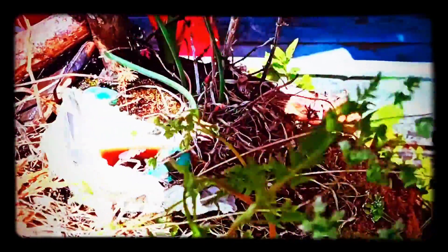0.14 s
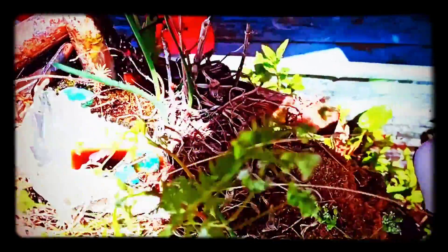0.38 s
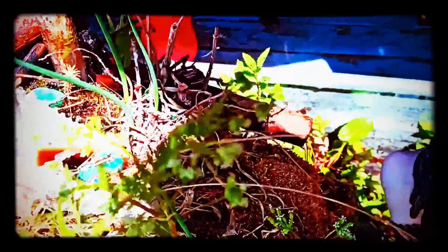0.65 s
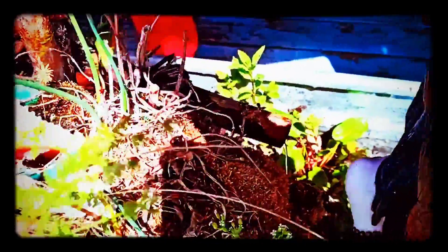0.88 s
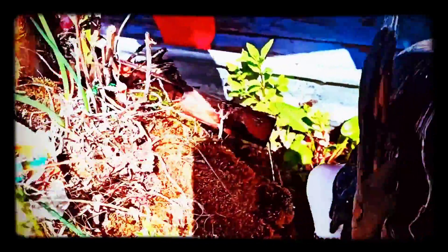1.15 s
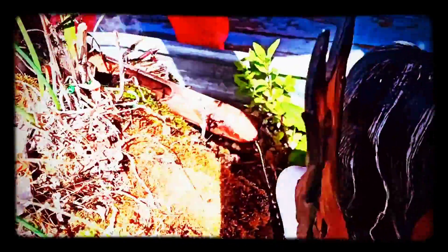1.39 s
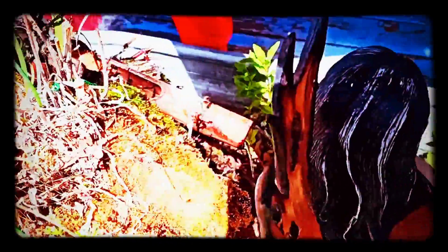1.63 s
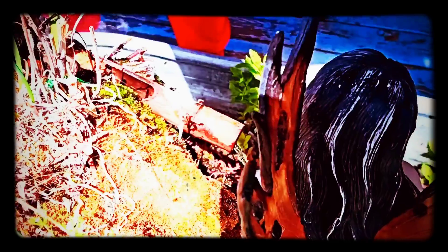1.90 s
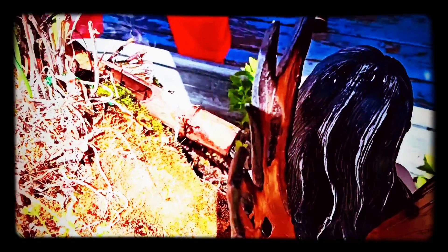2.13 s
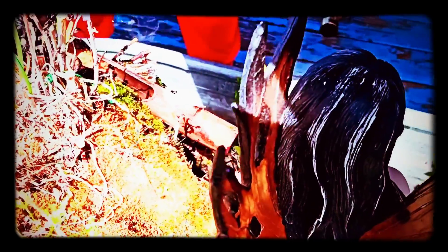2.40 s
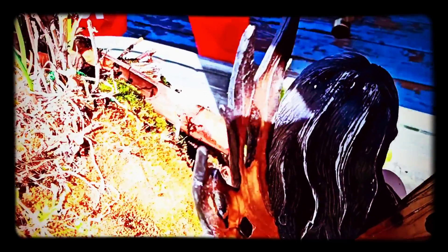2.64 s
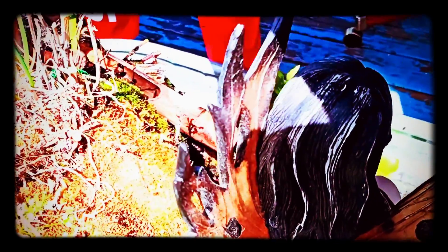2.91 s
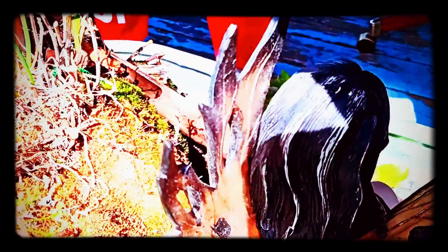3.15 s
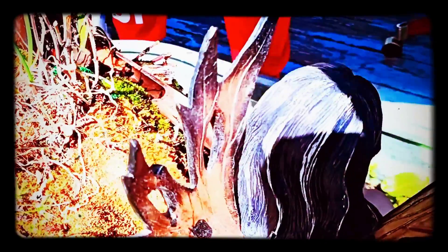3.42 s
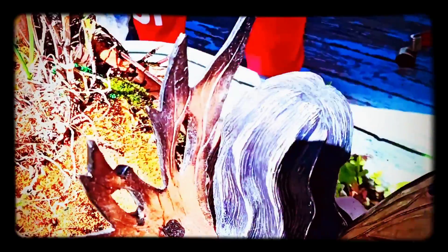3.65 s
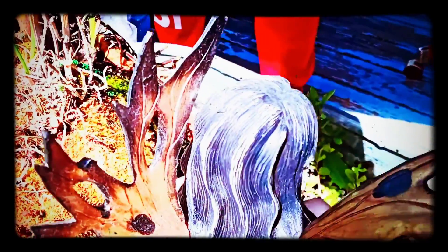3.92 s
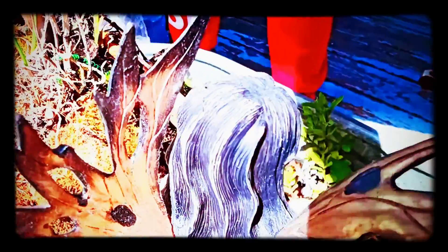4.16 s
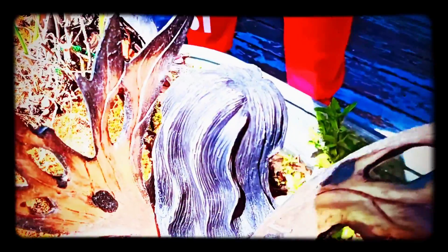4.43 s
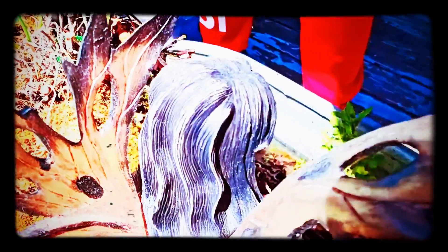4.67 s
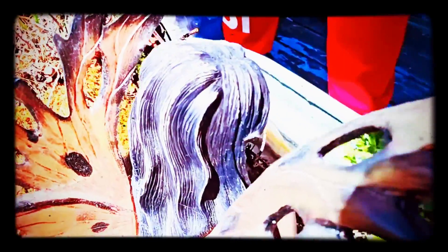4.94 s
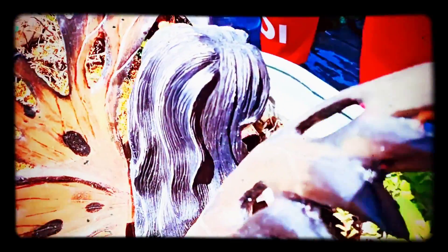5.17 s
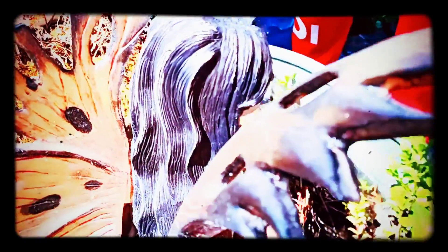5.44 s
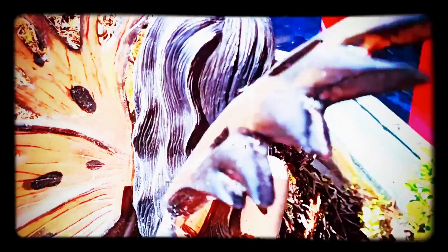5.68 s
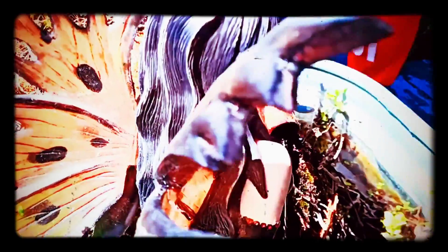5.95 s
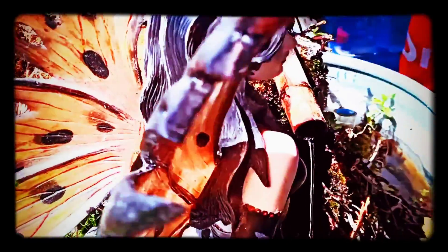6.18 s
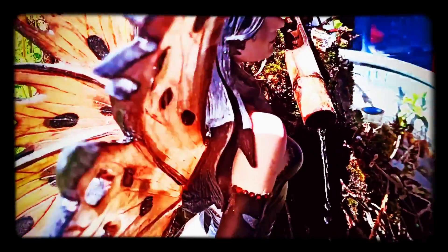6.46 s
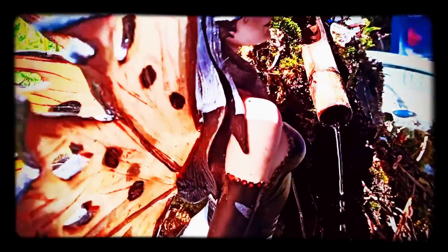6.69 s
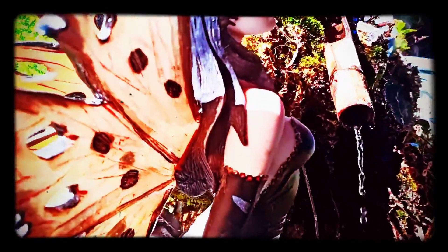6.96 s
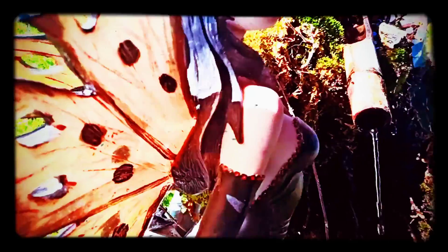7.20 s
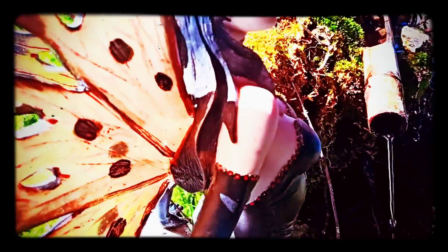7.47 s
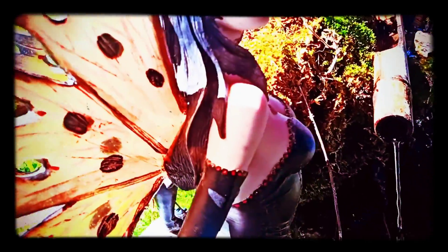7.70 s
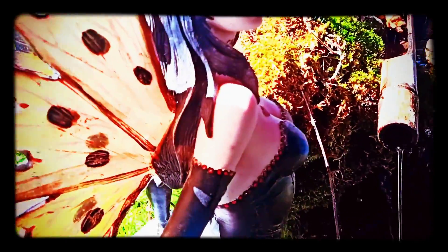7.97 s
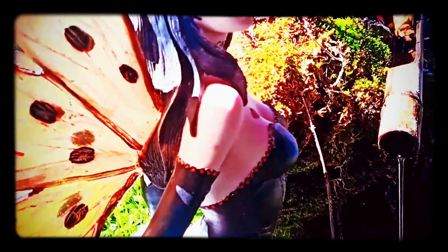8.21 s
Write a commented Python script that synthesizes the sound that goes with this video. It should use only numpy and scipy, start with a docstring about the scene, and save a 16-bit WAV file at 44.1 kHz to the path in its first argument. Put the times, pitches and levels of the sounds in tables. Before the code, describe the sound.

Outdoors, a thin stream falls from a spout into a shallow stony basin. At first the drips are sparse and light, with soft low bumps on the microphone; then bright splashes thicken, with bubbly plops and gurgles underneath. After a somewhat quieter middle, the last two seconds bring the strongest spits, plops and drops. Close, dry, single-channel sound with short dull echoes from stones and a faint distant rumble.

```python
"""Bright, ragged splashing drops, bubbly plops and glugs, soft thuds, dull knocks and a low outdoor rumble.
A garden fountain's thin jet breaks into drops on stones and shallow water: each loud drop is a noise
crack with a short, rising bubble sine. Bigger bubbles plop, the basin glugs and murmurs, fine spray spits.
Thuds are brief low waves at the hand-held microphone, handling clicks are dull noise bursts;
air, rumble and hiss are filtered noise."""
import sys
import numpy as np
from scipy import signal
from scipy.fft import rfft, irfft
from scipy.io import wavfile
from scipy.ndimage import uniform_filter1d

SR = 44100
rng = np.random.default_rng(int(sys.argv[2]) if len(sys.argv) > 2 else 0)


def attenuation_scalar(level_db):
    """Turn a level in dB into a linear amplitude multiplier (20 dB per decade)."""
    decades = np.asarray(level_db, float) / 20
    return 10 ** decades


def wav_record(signal):
    """Record a signal, one row per channel, as 16-bit PCM in the file named by sys.argv[1]."""
    frames = np.transpose(np.atleast_2d(signal))
    bounded = np.clip(frames, -1, 1)
    # unit amplitude maps onto the largest positive 16-bit level
    quanta = np.round(bounded * 32767).astype(np.int16)
    wavfile.write(sys.argv[1], SR, quanta)


N = 367794  # samples

# loud drops: (t/s, level before trim/dB, bubble end f/Hz, splash against bubble before trim/dB)
LOUD_DROPS = [(0.2974, -38.5, 5050, -24), (0.3278, -35, 4920, -24), (0.3972, -41.5, 5600, -21),
              (0.434, -52, 4920, 8), (0.464, -38.5, 6740, -8), (0.553, -45, 5340, -10),
              (0.59, -46, 6600, 1.5), (0.652, -44, 4670, -12), (0.499, -45, 6400, -7),
              (0.696, -51, 6300, -7), (0.873, -38.5, 3560, -18), (0.914, -41.5, 4060, -2.5),
              (0.9606, -40.5, 4750, -10), (1.191, -36, 5600, -8), (1.249, -41, 6360, -6),
              (1.326, -30.5, 5700, -5), (1.366, -40, 6400, -6), (1.403, -38.5, 5200, -14),
              (1.676, -34, 4800, -17), (1.761, -34.5, 5400, -12.5), (1.9782, -41, 7300, -5),
              (2.0344, -42, 7000, -19), (2.114, -35, 6620, -4.5), (2.27, -27.5, 5440, -8.5),
              (2.382, -38, 5800, -19), (2.432, -36.5, 6300, -31), (2.489, -39, 6100, 6),
              (2.5125, -40, 6200, 6.5), (2.548, -33.5, 6880, -3), (2.6259, -23.5, 6130, 1),
              (2.675, -35, 4440, -14), (2.6877, -40, 6250, 1), (2.71, -45, 6200, -3),
              (2.725, -47.5, 6360, 5.5), (2.783, -47, 6500, 2), (2.835, -41, 6200, -3),
              (2.879, -37, 6640, -1), (2.965, -27, 6770, -12), (3.07, -36, 6240, -6),
              (3.131, -31.5, 5600, -15), (3.235, -34.5, 6480, -7), (3.266, -44, 6200, -9),
              (3.435, -36, 6200, -1), (3.512, -33, 3900, -26), (3.758, -31.5, 6470, -32),
              (3.882, -40.5, 5900, -2), (4.251, -36, 6200, -1.5), (4.448, -28, 6140, -9.5),
              (4.5442, -38.5, 6840, -21), (4.624, -30.5, 5400, -31), (4.6864, -37, 5430, -19),
              (4.8342, -34.5, 6350, -2), (4.9262, -45, 7150, 7), (4.954, -30.5, 7020, -15),
              (5.086, -41.5, 5200, -17), (5.129, -40.5, 4520, -3), (5.19, -44, 6700, -2),
              (5.269, -49, 7100, -5), (5.352, -43, 5240, 5), (5.39, -40, 7900, 5), (5.455, -41, 4630, -12),
              (5.5586, -35.5, 5100, -5.5), (5.669, -32.5, 5230, -7), (5.7614, -29.5, 5600, -32),
              (5.804, -45.5, 5950, 5.5), (5.8583, -35.5, 5140, -13), (5.958, -39.5, 6140, 2.5),
              (6.1446, -28, 4760, -35), (6.1614, -37, 6250, 2), (6.221, -46.5, 5330, 9),
              (6.438, -43, 3440, -6), (6.5179, -30, 6400, -9), (6.5967, -28, 6200, -5),
              (6.662, -29.5, 5280, -7.5), (6.7606, -36.5, 4900, -10), (6.877, -42, 6500, 6.5),
              (6.971, -28, 5560, -7), (7.108, -37.5, 6240, 2), (7.2116, -40, 7000, -15),
              (7.2453, -36.5, 6200, 1), (7.305, -29, 5270, -0.5), (7.344, -39, 6500, 2),
              (7.4072, -49.5, 5400, 11), (7.505, -41, 4800, -21), (7.6197, -43.5, 3460, -12),
              (7.657, -41.5, 6600, 2.5), (7.7437, -38, 4600, -1), (7.823, -34, 3800, -9),
              (7.831, -22, 5400, -7), (7.952, -44.5, 4970, 3.5), (7.997, -37.5, 4220, -18),
              (7.969, -35, 6000, -9), (8.011, -41, 6360, 0), (8.1562, -31.5, 6860, -28),
              (8.199, -41.5, 6340, 4), (8.3036, -26, 6970, -8.5)]
# larger bubbles: (t/s, level before trim/dB, end f/Hz)
PLOP_BUBBLES = [(0.039, -44, 2780), (0.178, -47, 1440), (0.25, -34.5, 3800), (0.34, -45, 2220),
                (0.356, -40, 1460), (0.594, -39, 2630), (0.68, -43, 2760), (2.446, -40.5, 2390),
                (2.719, -31, 2400), (3.602, -49, 980), (4.282, -42.5, 1214), (4.706, -39, 2480),
                (4.838, -43, 1720), (5.115, -44, 2410), (5.151, -43, 1720), (5.241, -43, 2450),
                (5.286, -38, 2460), (5.332, -40, 2510), (5.361, -49, 2600), (5.457, -39, 2390),
                (5.665, -46, 2470), (5.692, -46, 1036), (6.663, -43, 925), (7.272, -42, 1075),
                (7.412, -39, 780), (8.196, -43, 885), (0.468, -42.5, 1430), (0.577, -38.5, 1050),
                (0.774, -35, 2610), (0.897, -38, 1530), (1.292, -36.5, 1560), (1.809, -32, 2520),
                (1.968, -36, 2300), (2.273, -32.5, 2400), (2.313, -35.5, 2030), (2.49, -34, 3460),
                (2.513, -31.5, 2380), (2.627, -23, 2670), (2.726, -29.5, 1152), (3.006, -36, 2820),
                (3.073, -33, 3160), (3.105, -34.5, 2480), (3.164, -28.5, 2510), (3.333, -36.5, 2440),
                (3.419, -38.5, 2730), (3.912, -37.5, 2610), (4.438, -33.5, 2740), (4.573, -36, 2840),
                (5.027, -36, 1970), (5.177, -37, 1750), (5.389, -37, 2770), (5.533, -38.5, 1690),
                (5.861, -34.5, 2280), (6.079, -33.5, 3150), (6.361, -38.5, 1820), (6.439, -23, 2540),
                (6.476, -31.5, 1184), (6.656, -32, 2570), (6.855, -31, 2660), (6.978, -28.5, 2500),
                (7.218, -35, 2660), (7.344, -23.5, 2430), (7.441, -36, 1700), (7.514, -37.5, 1520),
                (7.863, -39.5, 1630), (7.974, -37, 1515), (8.037, -37, 1115), (8.122, -38, 1720),
                (8.172, -36, 2960), (8.205, -33, 2390), (8.286, -34.5, 1870)]
# spits of spray: (t/s, level before trim/dB, top treble against the rest before trim/dB)
SPRAY_SPITS = [(0.071, -50, -5), (0.394, -49, -24), (0.962, -49, -20), (1.325, -43, -32), (1.4423, -72, -3),
               (1.851, -51, -24), (1.9774, -49, -22), (2.488, -46, -5), (2.612, -45, -11),
               (3.0047, -43, -29), (3.051, -44, -13), (3.555, -60, 14), (4.079, -47.5, -28),
               (4.253, -54, 6), (4.387, -42, -16), (4.449, -35, -8), (4.6152, -45, -20), (5.266, -45, -4),
               (5.757, -46, -22), (6.075, -48, -29), (6.108, -43, -31), (6.223, -39, -17),
               (6.3967, -50, -20), (6.4162, -33.5, -21), (6.446, -38.5, -4), (6.5164, -48, -21),
               (6.578, -31, -30), (6.597, -35, -26), (6.626, -37, -16), (6.6526, -34.5, -29),
               (6.815, -36, -26), (6.879, -41, -32), (6.9708, -31, -14), (7.079, -42, -23),
               (7.1118, -42, -22), (7.144, -38, -24), (7.212, -36, -21), (7.237, -38, -13),
               (7.301, -34.5, -16), (7.342, -41, -12), (7.4072, -33, -25), (7.681, -50, -22),
               (7.919, -47, -19), (8.302, -25, -26.5)]
# colour of microphone and stones: (f/Hz, gain/dB)
MIC_COLOUR = [(880, -11), (1500, -2), (2130, -15.5), (2400, -7), (2800, -11.5), (3330, -12), (3700, -8),
              (4100, -10.5), (4650, -6), (6470, 1.5), (6730, 2.5), (8060, -15), (10000, -9.5),
              (13400, -24.5), (15300, -2.5), (15750, -22), (16000, -55), (16800, -39)]


def in_time(rows):
    """Columns of a curve table at every sample."""
    s, *columns = np.transpose(rows)
    return [np.interp(np.arange(N) / SR, s, c) for c in columns]


def at_hz(points, hz):
    """Read a spectrum on a log-frequency axis."""
    table_hz, db = np.transpose(points)
    return np.interp(np.log(np.maximum(hz, 1)), np.log(table_hz), db)


def rms_one(x):
    """Scale to rms 1."""
    return x / np.sqrt(np.mean(x ** 2) + 1e-20)


def band_pass(x, order, low_hz, high_hz):
    """Keep what lies between two frequencies."""
    return signal.sosfilt(signal.butter(order, [low_hz, high_hz], "band", fs=SR, output="sos"), x)


def drift(pole_hz):
    """Slow random wander of rms 1: noise through two equal low-pass poles."""
    hop = 40  # samples between the points of the slow curve
    r = np.exp(-2 * np.pi * pole_hz * hop / SR)
    noise = rng.standard_normal(N // hop + 2002)
    slow = signal.lfilter([1], [1, -2 * r, r * r], noise)[2000:]  # skip the filter's start
    return np.interp(np.arange(N) / hop, np.arange(len(slow)), rms_one(slow))


def coloured(x, spectrum, size=8192):
    """Causal (minimum-phase) filter that follows a spectrum."""
    gain = attenuation_scalar(at_hz(spectrum, np.arange(size // 2 + 1) * SR / size))
    cepstrum = irfft(np.log(gain))
    cepstrum[1:size // 2] *= 2  # fold it forward in time
    cepstrum[size // 2 + 1:] = 0
    return signal.fftconvolve(x, irfft(np.exp(rfft(cepstrum))))[:N]


def laid_out(seconds, grains):
    """Add each row of grains at its time."""
    at = (np.asarray(seconds) * SR).astype(int)[:, None] + np.arange(grains.shape[1])
    return np.bincount(at.ravel(), grains.ravel(), N + grains.shape[1])[:N]


def bubbles(seconds, db, hz, octaves, cycles, rise_s, swell, size):
    """Sines that glide by some octaves to hz, swell, and die by 60 dB in some cycles."""
    t, hz = np.arange(size) / SR, hz[:, None]
    pitch = hz * 2 ** (-np.reshape(octaves, (-1, 1)) * np.exp(-(t / rise_s) ** 2))
    decay_s = np.reshape(cycles, (-1, 1)) / hz / np.log(1000)
    shape = (1 - np.exp(-t / (swell * decay_s))) ** 2 * np.exp(-t / decay_s)
    shape = shape * (pitch / hz) ** 2  # a smaller bubble radiates better
    shape = attenuation_scalar(db)[:, None] * shape / shape.max(axis=1, keepdims=True)
    # churning water makes each ring flutter; the 6 undoes the loss of level in smoothing
    flutter = uniform_filter1d(rng.standard_normal(shape.shape), size=36, axis=1) * 6
    shape = shape * (1 + 0.3 * flutter)
    return laid_out(seconds, shape * np.sin(2 * np.pi * np.cumsum(pitch, axis=1) / SR))


def cracks(seconds, db, decay_s, size=512):
    """Bursts of white noise that swell quickly and die, as where water shatters."""
    t = np.arange(size) / SR / decay_s
    shape = (1 - np.exp(-t / 0.19)) ** 2 * np.exp(-t)
    return laid_out(seconds, attenuation_scalar(db)[:, None] * shape * rng.standard_normal((len(db), size)))


def arrivals(chance, share, trail_s):
    """A share of small events trail a loud drop, plop or spit by a short random wait; the rest fall anywhere."""
    leaders = np.concatenate([np.transpose(rows)[0] for rows in (LOUD_DROPS, PLOP_BUBBLES, SPRAY_SPITS)])
    leader_s = leaders[(chance[:, 0] * len(leaders)).astype(int)]
    trailing = leader_s - trail_s * np.log(1 - chance[:, 1])
    s = np.where(chance[:, 2] < share, trailing, chance[:, 0] * N / SR)
    return np.minimum(s, (N - 1) / SR)


def far_air(level_db):
    """Far wash of air: noise bands that each wander in level, so the wash is patchy."""
    # spectrum of the air before levelling: (f/Hz, gain/dB)
    air_colour = [(120, -29), (200, -9), (410, 1.5), (480, 6), (700, 7.5), (840, 7), (968, 9.5),
                  (1560, 2.5), (1830, -4.5), (2400, -8), (3350, -20), (6340, 1.5), (8180, -49), (9000, -63),
                  (11700, -48), (19800, -120)]
    edges = np.geomspace(100, 9000, 15)
    patches = np.zeros(N)
    for low_hz, high_hz in zip(edges, edges[1:]):
        patch = band_pass(rng.standard_normal(N), 2, low_hz, high_hz)
        patches += patch * attenuation_scalar(2.57 * drift(6.1))
    return rms_one(coloured(patches, air_colour)) * attenuation_scalar(level_db - 1.5)


def low_rumble(level_db):
    """Low noise that wavers a little; a pump or far engine swells it with a narrow drone."""
    # spectrum of the rumble before levelling: (f/Hz, gain/dB)
    rumble_colour = [(18, -50), (30, -43), (39, -15), (50, -2.5), (107, 5.5), (188, -8), (260, -20),
                     (340, -35), (570, -120)]
    drone_hz, width_hz, drone_db = 110.9, 10.4, -5.5  # level against the rumble
    drone = band_pass(rng.standard_normal(N), 1, drone_hz - width_hz / 2, drone_hz + width_hz / 2)
    rumble = rms_one(coloured(rng.standard_normal(N), rumble_colour))
    return (rumble + attenuation_scalar(drone_db) * rms_one(drone)) * attenuation_scalar(level_db + 2.3 * drift(6.4))


def hiss():
    """A faint steady hiss under the treble: high-passed noise."""
    high = signal.butter(2, 9000, "high", fs=SR, output="sos")
    return attenuation_scalar(-70) * coloured(signal.sosfilt(high, rng.standard_normal(N)), MIC_COLOUR)


def thuds(size=2048):
    """Pushes on the microphone: a low wave under a bell, steeper in front, each as abrupt as chance makes it."""
    # thuds: (start t/s, level/dB, f/Hz)
    pushes = [(0.052, -39, 174), (0.257, -40, 185), (0.302, -36, 169), (0.405, -34.5, 183),
              (0.439, -35, 191), (0.601, -40, 174), (0.715, -43.5, 183), (1.617, -48, 125),
              (1.725, -38.5, 166), (2.059, -43, 184), (2.179, -49, 151), (2.331, -45.5, 180),
              (2.675, -40, 176), (3.104, -37, 172), (3.254, -41.5, 150), (4.015, -36, 168),
              (4.124, -38, 164), (4.224, -42.5, 135), (4.318, -45, 143), (4.728, -45, 129),
              (4.78, -40.5, 147), (4.924, -31, 141), (5.011, -42, 152), (5.11, -39.5, 175),
              (6.302, -40.5, 127), (7.133, -29.5, 170), (7.211, -39, 143)]
    s, db, hz = np.transpose(pushes)
    turns = (np.arange(size) / SR - .008) * hz[:, None]  # cycles from the middle of the bell
    front = 0.31 + 0.21 * rng.random((len(s), 1))
    bell = np.exp(-(turns / np.where(turns < 0, front, 0.85)) ** 2)
    return laid_out(s, attenuation_scalar(db)[:, None] * bell * np.cos(2 * np.pi * turns + 0.19))


def handling_clicks():
    """Dull broadband knocks, some with thuds, as the microphone is handled: band-passed noise bursts."""
    # knocks: (t/s, level before trim/dB)
    click_events = [(1.247, -43.5), (3.104, -48), (4.785, -48.5), (4.926, -50.5), (5.039, -46),
                    (5.176, -49.5), (6.439, -51), (6.473, -54)]
    s, db = np.transpose(click_events)
    return band_pass(cracks(s, db + 13, 0.0088, size=3000), 2, 350, 2800)


def gurgle(level_db, count=1100):
    """Many faint bubbles overlap under the stones."""
    chance = rng.random((count, 4))
    s = chance[:, 0] * N / SR
    size_db = -2.6 * np.log(np.maximum(chance[:, 1], .08))  # few are large
    db = (level_db + 2.05 * drift(9.0))[(s * SR).astype(int)] - 4.5 + size_db
    hz = 840 * 2 ** (1.152 * chance[:, 2])
    return bubbles(s, db, hz, octaves=0.12 * chance[:, 3], cycles=20 + 39.0 * chance[:, 3],
                   rise_s=0.013, swell=0.25, size=2560)


def murmur(level_db):
    """The hollow of the basin resonates: narrow noise bands whose levels wander."""
    # resonances of the hollow: (f/Hz, width f/Hz, level against the murmur before trim/dB)
    hollow_modes = [(330, 67, 0.5), (481, 75, 1.5)]
    out = np.zeros(N)
    for hz, width_hz, mode_db in hollow_modes:
        mode = rms_one(band_pass(rng.standard_normal(N), 2, hz - width_hz / 2, hz + width_hz / 2))
        out += mode * attenuation_scalar(level_db - 1.0 + mode_db + 4.1 * drift(11.5))
    return out


def glugs():
    """Big slow bubbles in the basin, of nearly steady pitch."""
    # glugs: (t/s, level before trim/dB, end f/Hz)
    glug_events = [(0.47, -50, 570), (4.195, -51, 483), (4.323, -52.5, 393), (5.12, -48, 499),
                   (5.536, -55, 465), (5.697, -44, 472), (6.475, -50, 470), (6.678, -51, 439),
                   (1.601, -55, 537), (2.07, -51.5, 505), (6.39, -55.5, 330), (6.51, -51.5, 332),
                   (6.781, -52.5, 323), (6.833, -47.5, 330), (6.905, -53, 323), (6.83, -50, 460),
                   (0.972, -51.5, 543), (2.558, -48.5, 478), (3.885, -44.5, 467), (3.968, -43.5, 493),
                   (4.112, -41.5, 468), (4.148, -47, 510), (4.255, -47, 506), (5.042, -48, 598),
                   (5.677, -46.5, 464), (6.31, -44.5, 466), (6.387, -52, 480), (6.509, -39.5, 448),
                   (6.714, -44.5, 458), (7.417, -43.5, 445), (7.47, -40.5, 430), (8.139, -45.5, 444)]
    s, db, hz = np.transpose(glug_events)
    return bubbles(s - .004, db - 0.5, hz, octaves=0.013, cycles=38.0, rise_s=0.0015, swell=0.19, size=6000)


def plops():
    """Larger bubbles ring briefly; the deeper their pitch, the more they rise."""
    s, db, hz = np.transpose(PLOP_BUBBLES)
    return bubbles(s - .001, db - 6.5, hz, octaves=0.073 * (1500 / hz) ** 2,
                   cycles=35.5 * (hz / 1500) ** -0.6, rise_s=0.0042, swell=0.53, size=2048)


def spray(level_db, count=600):
    """Loud spits over a clumped fine crackle of varied brightness, each fine crack with a tiny bubble."""
    s, db, top_db = np.transpose(SPRAY_SPITS)
    chance = rng.random((count, 4))
    fine_s = arrivals(rng.random((count, 3)), share=0.55, trail_s=0.025)
    size_db = -3.1 * np.log(np.maximum(chance[:, 1], .04))
    fine_db = (level_db + 26.0 + 2.5 * drift(5.5))[(fine_s * SR).astype(int)] + size_db
    # chance tilts each fine crack between the lower and the top treble
    low = cracks(s, db + 16.0, 0.0015) + cracks(fine_s, fine_db - 13 * chance[:, 2] - 0.5, 0.0035)
    top = cracks(s, db + top_db + 20, 0.003)
    top = top + cracks(fine_s, fine_db - 13 * (1 - chance[:, 2]) - 6.5, 0.0046)
    tiny = bubbles(fine_s, fine_db - 10.0, 7800 * 2 ** (0.72 * chance[:, 3]), octaves=0.25 * chance[:, 2],
                   cycles=28.0, rise_s=0.0026, swell=0.65, size=384)
    high = signal.butter(3, 12500, "high", fs=SR, output="sos")
    return band_pass(low, 3, 7000, 12500) + tiny + signal.sosfilt(high, top)


def patter(level_db, count=5200):
    """Small drops, with gliding bubbles and hisses, partly trail the loud ones in clumps; few are large."""
    # hiss of large, middling and small drops: (low f/Hz, high f/Hz)
    splash_ranges = [(1500, 3300), (2400, 4600), (3600, 7800)]
    chance = rng.random((count, 6))
    s = arrivals(rng.random((count, 3)), share=0.4, trail_s=0.03)
    at = (s * SR).astype(int)
    size_db = -2.6 * np.log(np.maximum(chance[:, 1], .12))
    # each size of drop clumps in its own time
    clump_db = 2.7 * np.array([drift(8.9) for _ in splash_ranges])
    size_class = (chance[:, 2] * len(clump_db)).astype(int)
    db = level_db[at] + clump_db[size_class, at] + size_db
    hz = 1900 * 2 ** (1.868 * chance[:, 2])
    # most bubbles rise, some fall a little
    out = bubbles(s, db + 2.5 + 2.7 * np.log2(hz / 4000), hz, octaves=0.596 * chance[:, 3] ** 2 - .12,
                  cycles=18 + 40 * chance[:, 4], rise_s=0.00286, swell=0.96, size=768)
    hiss_db = db + 10.0 - 14 * chance[:, 5]
    for low_hz, high_hz in splash_ranges:  # drops hiss in the ranges around their bubble's pitch
        near = (hz >= low_hz * 1.25) & (hz < high_hz / 1.1)
        out = out + band_pass(cracks(s[near], hiss_db[near], 0.0047), 2, low_hz, high_hz)
    return signal.sosfilt(signal.butter(6, 7400, fs=SR, output="sos"), out)


def plunges():
    """Drops punch a deep cavity, which whips upward and is loudest as it pinches shut."""
    # plunging drops: (t/s, level before trim/dB, end f/Hz)
    cavities = [(4.7009, -23, 7030), (6.812, -19.5, 6860), (7.34, -26.5, 5120)]
    s, db, hz = np.transpose(cavities)
    return bubbles(s, db - at_hz(MIC_COLOUR, hz), hz, octaves=1.405, cycles=62,
                   rise_s=0.0033, swell=2.2, size=1024)


def droplets(seconds, db, count=6):
    """The crown of each splash falls back as a ragged, fading run of small cracks."""
    chance = rng.random((len(db), count, 2))
    late_s = 0.0023 + 0.027 * chance[..., 0]
    level_db = db[:, None] - 9.5 - 350 * late_s - 9.2 * chance[..., 1]
    return cracks((seconds[:, None] + late_s).ravel(), level_db.ravel(), 0.0019)


def drops():
    """The loud drops: a short rising bubble inside a noisy splash."""
    s, db, hz, splash_db = np.transpose(LOUD_DROPS)
    # lift each ring by what the microphone's colour will take away
    ring = bubbles(s, db - at_hz(MIC_COLOUR, hz) + 0.5, hz, octaves=0.14, cycles=49.6,
                   rise_s=0.0023, swell=0.43, size=1024)
    splash = cracks(s, db + splash_db + 14, 0.0024) + droplets(s, db + splash_db + 15.0)
    return ring + band_pass(splash, 4, 2100, 7400)


def stones(x, size=6000):
    """Dense, dull early echoes from stones and leaves close by: decaying low-passed noise."""
    t60_s, echo_db, cut_hz = 0.073, -10, 11500
    t = np.arange(size) / SR
    echoes = rng.standard_normal(size) * attenuation_scalar(-60 * t / t60_s) * (t > .0015)
    echoes = signal.sosfilt(signal.butter(2, cut_hz, fs=SR, output="sos"), echoes)
    return x + attenuation_scalar(echo_db) * signal.fftconvolve(x, echoes / np.linalg.norm(echoes))[:N]


def scene():
    """All sources, one channel; nearness sets the patter, the air and the gurgle."""
    # how near and open the path from the water to the moving microphone is: (t/s, swing before share/dB)
    nearness = [(0, -2.5), (0.65, -1), (0.8, -1.5), (1.1, 4.5), (2.7, 2), (3.5, 6), (4.4, 1.5), (4.9, 1.5),
                (5.8, 0.5), (6.6, 5), (7.15, 0), (7.35, 6), (7.58, 3), (7.9, 3.5), (8.34, 2)]
    # far rumble: (t/s, level/dB)
    rumble_curve = [(0, -58), (0.6, -58.5), (1.2, -62.5), (1.6, -54.5), (2.8, -56.5), (3.5, -52),
                    (4.4, -56), (4.9, -54), (6.5, -53.5), (7.3, -52.5), (7.7, -50.5), (8.34, -53)]
    # how busily the basin glugs, heard in its murmur: (t/s, level before trim/dB)
    glugging = [(0, -75.5), (0.8, -79), (1.3, -72), (1.8, -68), (2.5, -70.5), (2.8, -69.5), (3.1, -76.5),
                (3.5, -67), (4.2, -70), (4.6, -70), (5.1, -66), (5.35, -72.5), (5.65, -70.5), (6.1, -79),
                (6.35, -63), (6.9, -78), (7.1, -73.5), (7.5, -59.5), (7.85, -80.5), (8.15, -74),
                (8.34, -76)]
    # how openly the microphone faces the spray: (t/s, level before trim/dB)
    spray_view = [(0, -67), (0.7, -75.5), (1.1, -64), (1.5, -72.5), (2, -66), (2.6, -77.5), (3.2, -70),
                  (3.8, -78), (4.3, -73), (4.8, -65), (5.1, -76.5), (5.4, -68), (6, -68), (6.6, -63),
                  (7.3, -67.5), (7.7, -64), (8.34, -67.5)]
    curves = (nearness, rumble_curve, glugging, spray_view)
    (near_db,), (rumble_db,), (murmur_db,), (spray_db,) = map(in_time, curves)
    # level at nearness 0 and the share of its swing that each follows
    patter_db = -57 + 0.63 * near_db
    wash_db = -60 + 0.58 * near_db
    # the wash thickens steadily on the way round to the spout, by 0.8 dB per second
    wash_db = wash_db + 0.8 * (np.arange(N) - N / 2) / SR
    background = far_air(wash_db) + low_rumble(rumble_db) + hiss()
    basin = gurgle(wash_db) + murmur(murmur_db) + glugs() + plops()
    splashes = coloured(spray(spray_db) + patter(patter_db) + plunges() + drops(), MIC_COLOUR)
    echoed = stones(handling_clicks() + basin + splashes)
    return (background + thuds() + echoed)[None]


def roll_off(x):
    """The treble ends steeply here."""
    return signal.sosfilt(signal.butter(12, 16960, fs=SR, output="sos"), x)


def record(dry):
    """Finish the mix for writing."""
    return roll_off(dry)


dry = scene()
out = record(dry)
wav_record(out)
```